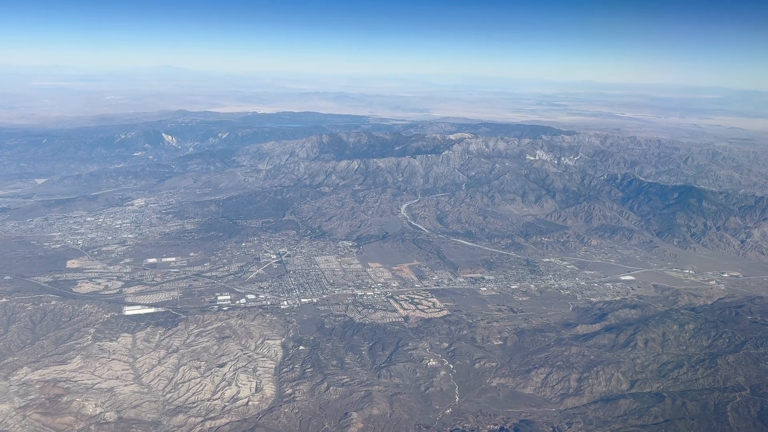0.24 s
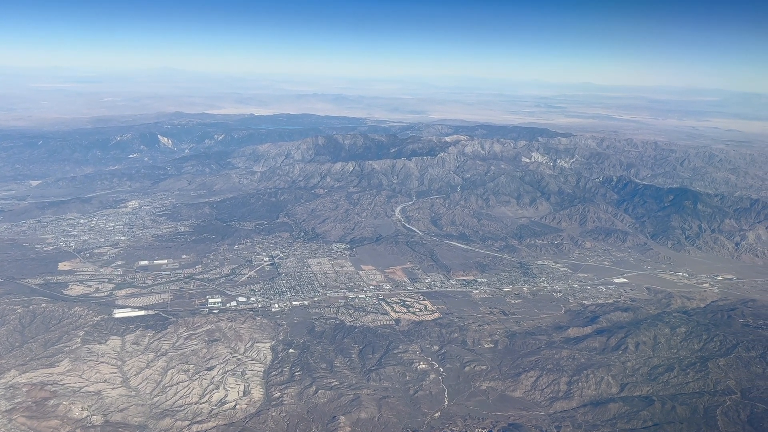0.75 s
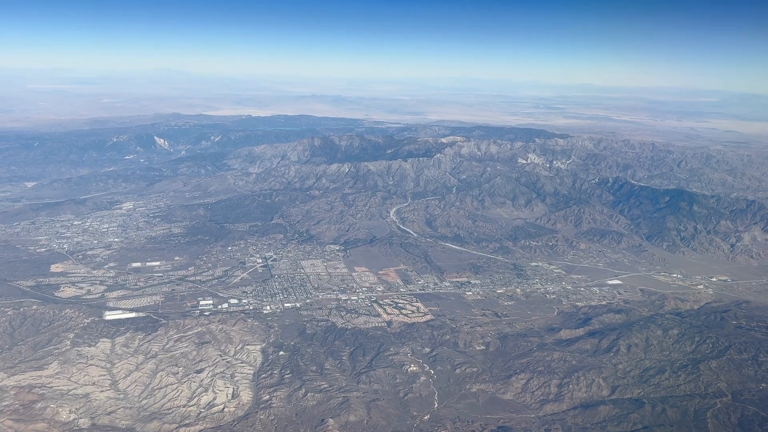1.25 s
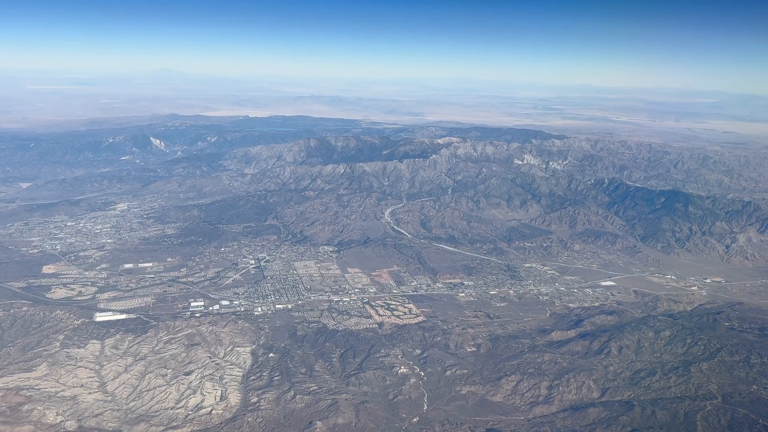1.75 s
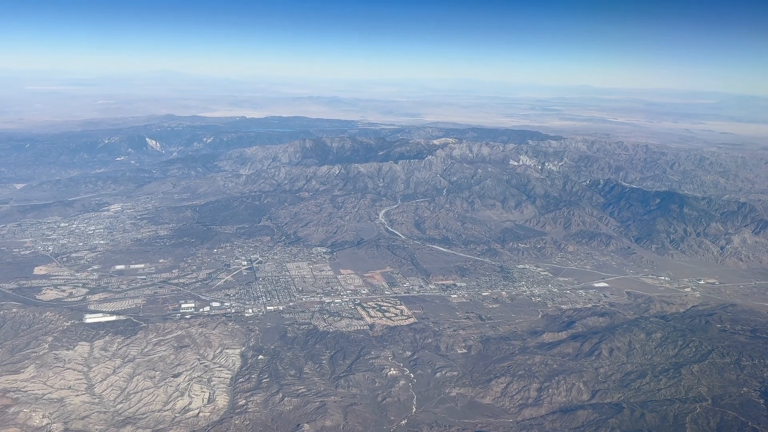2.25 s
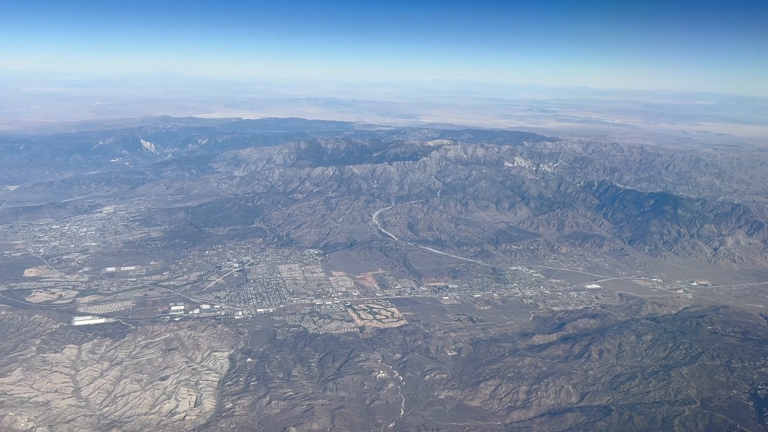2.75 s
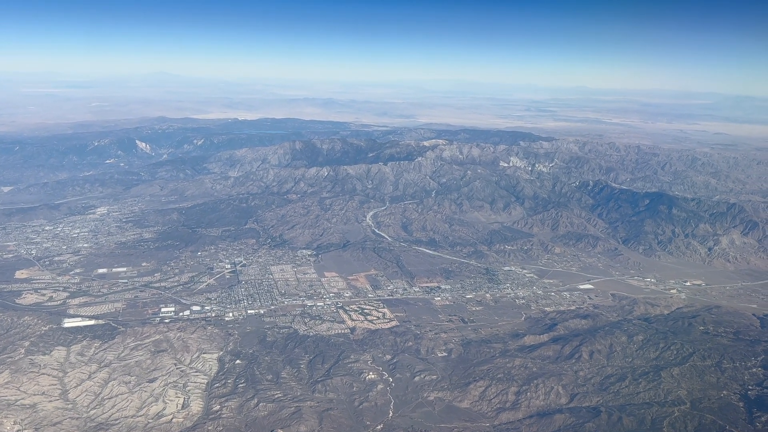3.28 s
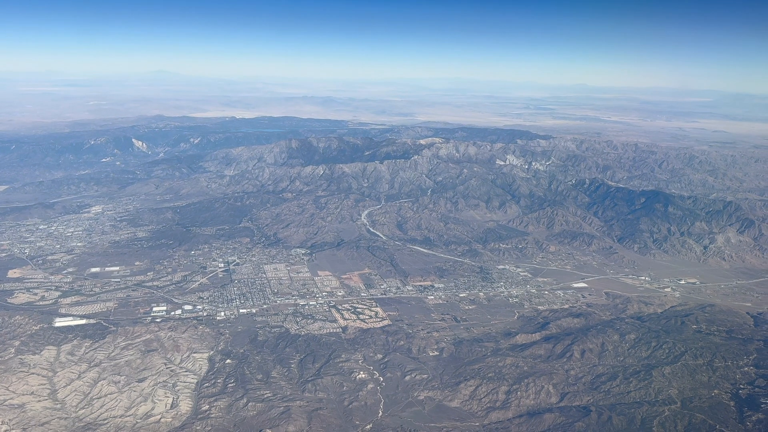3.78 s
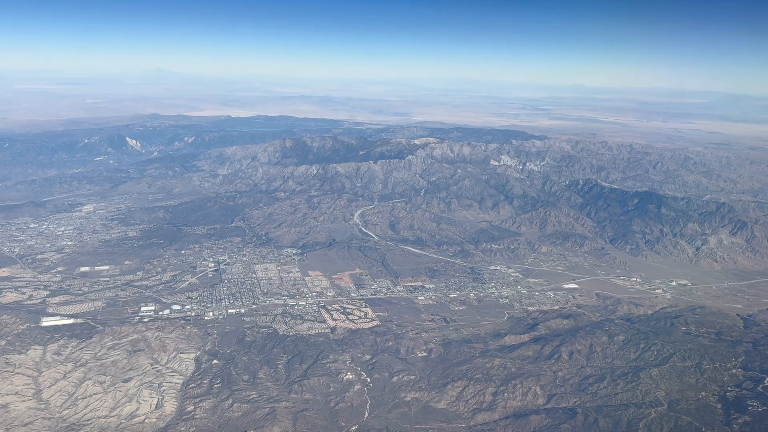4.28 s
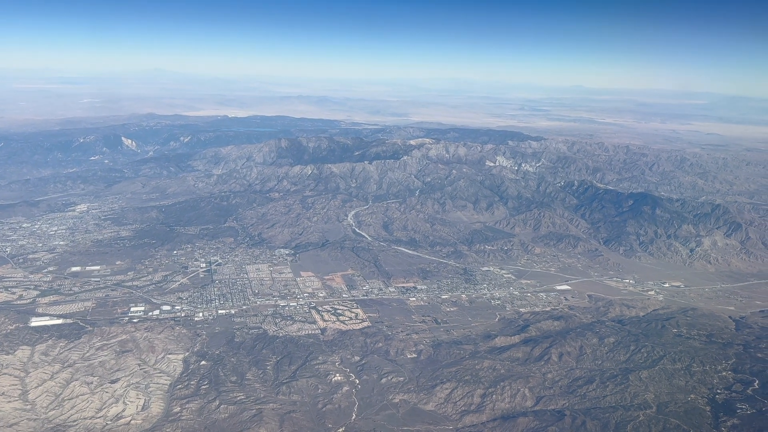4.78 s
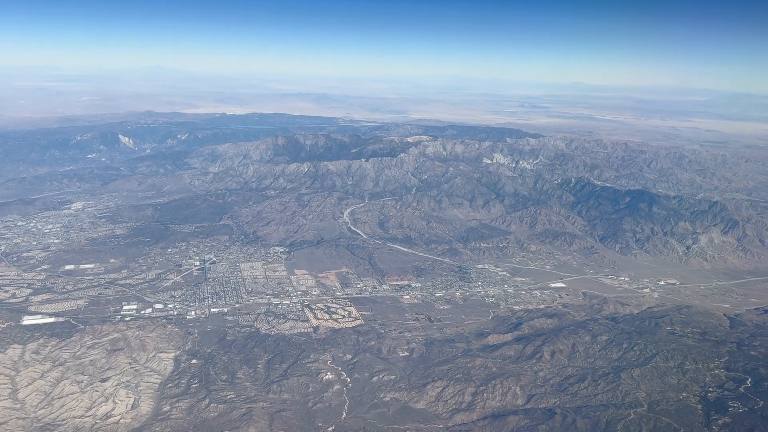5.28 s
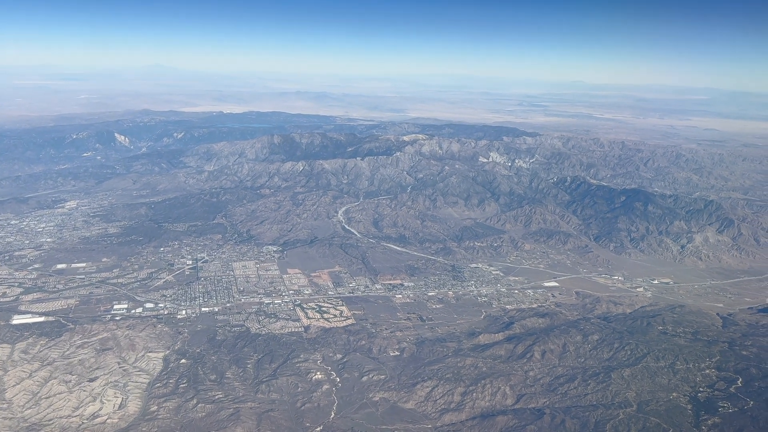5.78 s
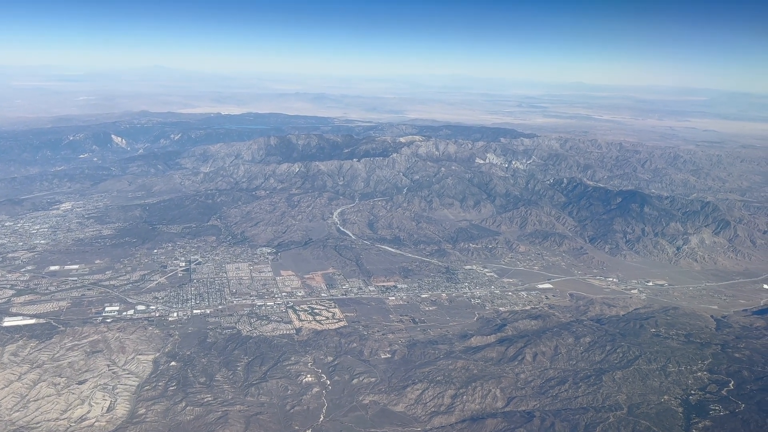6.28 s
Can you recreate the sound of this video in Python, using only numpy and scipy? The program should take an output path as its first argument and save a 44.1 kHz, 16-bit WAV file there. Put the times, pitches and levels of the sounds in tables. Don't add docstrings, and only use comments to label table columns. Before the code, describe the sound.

A broad, bass-heavy cabin roar fills both sides, gently gusting, with a hum around 800 hertz and faint higher machine tones inside it. Small close sounds sit on top: a crisp latch snap, light ticks, barely audible cloth rustles and seat squeaks. The sound sinks to complete silence, then fades up into a similar drone at another seat, ending with ticks.

```python
import sys
import numpy as np
from scipy import signal
from scipy.fft import rfft, irfft
from scipy.io import wavfile

SR = 44100
rng = np.random.default_rng(int(sys.argv[2]) if len(sys.argv) > 2 else 0)


def unload_wav(signal):
    wavfile.write(
        sys.argv[1],
        SR,
        np.round(np.clip(np.atleast_2d(signal).T, -1, 1) * 32767).astype(np.int16),
    )


def undo_db(level):
    steps = np.asarray(level, float) / 20
    return 10 ** steps


N = 287973
TIME = np.arange(N) / SR
CUT_S = 4.722

# freq_hz, density_db (per Hz)
RUMBLE_SPECTRUM = [(24, -39), (36, -34), (41, -25.5), (44, -12), (60, -8.5), (72, -5), (95, -2), (140, -1),
                   (200, -3.5), (230, -8), (300, -10.5), (400, -16), (500, -22), (570, -27.5)]
# freq_hz, density_db (per Hz)
HISS_SPECTRUM = [(750, -33), (1000, -38), (1400, -40), (2000, -45), (3000, -50), (4000, -53), (6000, -59),
                 (8000, -64), (11000, -66.5), (15700, -69.5)]
# freq_hz, change_db
SECOND_SEAT_COLOUR = [(30, -7), (45, -5.5), (62, 0.5), (100, -5), (150, -1.5), (300, -4), (500, 0),
                      (1200, 0.2), (4000, 1), (12000, 0.1)]
# freq_hz, likeness (0-1)
STEREO_LIKENESS = [(40, 0.87), (100, 0.93), (180, 0.98), (300, 0.55), (600, 0.42), (1400, 0.43),
                   (3100, 0.57), (6800, 0.36), (15000, 0.2)]
# freq_hz, left_over_right_db
STEREO_LEAN = [(60, -0.5), (110, 0.5), (200, -1.5), (380, 3), (700, -5), (1290, 4), (2380, -1.5),
               (4400, 1.0), (8120, 1), (15000, 2)]
# time_s, level_db
GUSTS = [(0, 1.5), (.6, -1), (1.4, 0.9), (1.85, -1.25), (2.6, -1), (3.3, 1), (3.7, -0.5), (4.5, .5),
         (5.5, -1.1), (6.1, 0.5), (6.35, -2.5), (6.53, 1.2)]
# centre_hz, width_hz, first_seat_db, second_seat_db, left_over_right_db
DUCT_RESONANCES = [(93.75, 10.7, -41.5, -40.5, 0.2), (171.7, 3, -54, -39, -0.5),
                   (200.7, 9.4, -39.5, -41.5, -0.8), (250.8, 5, -41.5, -42.5, 1.5),
                   (310.7, 8, -49.5, -48.5, 2.5), (372, 2.8, -52, -56.5, 1), (420.6, 5.3, -50, -57.5, -0.5),
                   (1488.3, 40, -60.5, -62.5, 3.5), (2986, 30, -75.5, -74, 7), (12200, 550, -90.5, -92, 2)]
# multiple (of the supply), first_seat_db, second_seat_db, left_over_right_db, left_lead_rad
WHINE_HARMONICS = [(2, -38.5, -38.5, 2.2, 0.29), (3, -63.5, -64, -2.5, 0), (4, -63, -64.5, -9.5, -.3),
                   (5, -65.5, -66, 1.5, -0.22), (6, -77, -73.5, -.6, 0), (7, -80.5, -78.5, 1, 0),
                   (8, -79, -83.5, -2.5, 0), (9, -83, -90, 3, 0), (10, -71.5, -77, 2, 0.095),
                   (11, -81.5, -79.5, -3, 0.038), (13, -82, -81.5, -1.5, 0), (14, -80.5, -83.5, 6, .2),
                   (15, -82, -90, -3.5, -0.038), (16, -93, -91, 3.5, 0), (17, -94.5, -87, -5.5, 0),
                   (18, -96.5, -97, 3.5, 0), (19, -90.5, -97, 3, 0)]
PUMPS_IN_STEP_S = [.05, .53, 1.54, 4.45, 5.1, 6.25]
# first_seat_hz, second_seat_hz, level_db, wander_hz, waver_db
SHAFT_TONES = [(1481, 1489, -59, 3.986, 2), (2593, 2600, -76, 1.5, 3.5), (3709, 4000, -88.5, 0.99, 1.5),
               (3950, 6600, -83, 1.9, 0), (5930, 4600, -87, 1.5, 0.5)]
# mode_hz, width_hz, level_db
LATCH_RINGING = [(1760, 380, 2.5), (2260, 400, -3.5), (3470, 730, 3.5), (4400, 1200, -9.5), (5460, 940, -8),
                 (6350, 630, -3.5), (8750, 1300, -8), (10500, 1500, -7), (12100, 1100, -6.5),
                 (14600, 1000, -10.5)]
# start_s, peak_db, centre_hz,
# t60_s
TICKS = [(.044, -50, 4800, .03), (6.517, -43, 4300, .03), (1.831, -44, 4700, .025),
         (1.8395, -37, 2100, .05), (6.073, -43, 3800, .08), (6.08, -42, 2300, .08),
         (6.21, -44, 2500, .05), (2.086, -56, 6000, .03), (2.655, -58, 8000, .04),
         (3.61, -53, 3000, .04), (4.912, -50, 8000, .03), (5.125, -57, 7000, .03),
         (5.742, -58, 8000, .04)]
# start_s, length_s, level_db, centre_hz, width_hz
CLOTH_RUSTLES = [
    (.085, .055, -67, 5000, 2000),
    (4.87, .17, -65, 4800, 700),
    (5.34, .12, -70, 7000, 2500),
    (2.42, .16, -76, 9000, 5000),
    (4.88, .12, -71, 6300, 2500),
    (5.12, .1, -74, 7500, 6000),
    (5.335, .1, -70, 9500, 6000),
    (6.068, .038, -65, 4800, 4500),
]
# start_s, length_s, level_db, start_hz, end_hz
SEAT_SQUEAKS = [
    (2.58, .34, -75, 3280, 3420),
    (2.98, .2, -69, 3390, 3420),
    (4.76, .3, -67, 1620, 1920),
    (5.46, .14, -71, 2540, 2660),
    (6.37, .17, -69, 3790, 4010),
    (.03, .04, -57, 1300, 1300),
    (1.17, .07, -52, 680, 680),
]


def rms_one(x):
    return x / np.sqrt(np.mean(x ** 2) + 1e-20)


def by_seat(first, second):
    return np.where(TIME < CUT_S, first, second)


def at_hz(points, hz):
    points_hz, values = np.transpose(points)
    return np.interp(np.log(hz), np.log(points_hz), values)


def pan(x, lean_db):
    return x * undo_db(lean_db * np.array([[.5], [-.5]]))


def stereo(mid, side):
    return mid + side * [[1], [-1]]


def resonate(x, hz, width_hz):
    r = np.exp(-np.pi * width_hz / SR)
    poles = [1, -2 * r * np.cos(2 * np.pi * hz / SR), r * r]
    return signal.lfilter([(1 - r * r) / 2, 0, (r * r - 1) / 2], poles, x)


def resonate_twice(x, hz, width_hz):
    return resonate(resonate(x, hz, width_hz), hz, width_hz)


def drift(rate_hz):
    r = np.exp(-2 * np.pi * rate_hz / SR)
    slow = signal.lfilter([1], [1, -2 * r, r * r], rng.standard_normal(N + SR))
    return rms_one(slow[SR:])


def tone(hz, lead_rad=0, turn=0):
    turns = np.cumsum(hz) / SR + turn
    return np.sqrt(2) * np.sin(2 * np.pi * turns + np.array([[lead_rad], [0]]))


def window(start_s, length_s):
    return np.sin(np.pi * np.clip((TIME - start_s) / length_s, 0, 1)) ** .5


def fan():
    level_db = by_seat(-48.5, -60.5) + 1.5 * drift(3.5)
    return undo_db(level_db) * tone(47 + .4 * drift(3))


def shafts():
    out = 0
    for first_hz, second_hz, level_db, wander_hz, waver_db in SHAFT_TONES:
        hz = by_seat(first_hz, second_hz) + wander_hz * drift(5.93)
        out = out + undo_db(level_db + waver_db * drift(8.3)) * tone(hz)
    return out


def spool():
    creep_hz_per_s, climb_start_s, climb_hz_per_s = 2.2, 2.0, 10.2
    hz = 457.7 + creep_hz_per_s * TIME + climb_hz_per_s * np.maximum(TIME - climb_start_s, 0)
    level_db = -52.5 + 2.9 * drift(6.2)
    return (TIME < CUT_S) * undo_db(level_db) * tone(hz + 1.5 * drift(5.5), lead_rad=.2)


def squeaks():
    out = 0
    for start_s, length_s, level_db, start_hz, end_hz in SEAT_SQUEAKS:
        glide_hz = np.interp(TIME, [start_s, start_s + length_s], [start_hz, end_hz])
        hz = glide_hz + 20 * drift(30)
        out = out + undo_db(level_db + 2.4 * drift(30)) * window(start_s, length_s) * tone(hz)
    return out


def rustles():
    out = 0
    for start_s, length_s, level_db, hz, width_hz in CLOTH_RUSTLES:
        mid, side = resonate_twice(rng.standard_normal((2, N)), hz, width_hz)
        rub = rms_one(stereo(mid, 0.24 * side))
        out = out + undo_db(level_db + 2.0 * drift(120)) * window(start_s, length_s) * rub
    return out


def ticks():
    out = np.zeros((2, N))
    after_s = np.arange(SR // 8) / SR
    for start_s, peak_db, hz, t60_s in TICKS:
        mid, side = rng.standard_normal((2, len(after_s)))
        crack = undo_db(-60 * after_s / t60_s) * np.minimum(after_s / .0008, 1)
        tail = undo_db(-17 - 60 * after_s / .12)
        burst = resonate_twice(stereo(mid, .4 * side) * (crack + tail), hz, .75 * hz)
        at = round(start_s * SR)
        out[:, at:at + len(after_s)] += undo_db(peak_db) * burst[:, :N - at]
    return out


def latch():
    release_s, scrape_lead_s = 1.839, .0025
    mid, side = rng.standard_normal((2, N))
    away_ms = 1000 * np.abs(TIME - release_s)
    snap = undo_db(-40 - 11 * away_ms)
    scrape = (TIME > release_s - scrape_lead_s) * undo_db(-50 - .9 * away_ms)
    force = (snap + scrape) * stereo(mid, .5 * side)
    out = 0
    for hz, width_hz, level_db in LATCH_RINGING:
        out = out + undo_db(level_db) * np.sqrt(2500 / width_hz) * resonate(force, hz, width_hz)
    return out


def load():
    start_s, rise_s, hold_s, release_s = .66, .14, .36, .09
    return np.interp(TIME, np.cumsum([start_s, rise_s, hold_s, release_s]), [0, 1, 1, 0])


def pumps():
    sag_hz = 16.8
    hz_a = by_seat(899.05, 899.65) - sag_hz * load()
    hz_b = by_seat(896.95, 897.95)
    apart = np.interp(PUMPS_IN_STEP_S, TIME, np.cumsum(hz_a - hz_b) / SR)
    slip = np.interp(TIME, PUMPS_IN_STEP_S, apart - np.round(apart))
    pump_a = undo_db(-46.5 - 2.0 * load()) * tone(hz_a, lead_rad=0.62)
    pump_b = undo_db(-58) * tone(hz_b, lead_rad=0.6, turn=slip)
    return pan(pump_a + pump_b, lean_db=-3.5)


def whine():
    supply_hz = by_seat(402.75, 403.45)
    swell_db = 1.5 * load()
    out = 0
    for multiple, first_db, second_db, lean_db, lead_rad in WHINE_HARMONICS:
        if multiple < 2.5:
            waver_db = swell_db + .5 * drift(4.5)
        else:
            waver_db = 0.87 * drift(4.3)
        harmonic = tone(np.round(multiple) * supply_hz, lead_rad, rng.random())
        out = out + undo_db(by_seat(first_db, second_db) + waver_db) * pan(harmonic, lean_db)
    return out


def ducts():
    out = 0
    for hz, width_hz, first_db, second_db, lean_db in DUCT_RESONANCES:
        mid, side = resonate_twice(rng.standard_normal((2, N)), hz, width_hz)
        singing = rms_one(stereo(mid, 0.27 * side))
        out = out + undo_db(by_seat(first_db, second_db)) * pan(singing, lean_db)
    return out


def at_both_seats(spectrum, hz):
    second = spectrum * undo_db(at_hz(SECOND_SEAT_COLOUR, hz))
    return by_seat(irfft(spectrum, N), irfft(second, N))


def airflow():
    hz = np.maximum(np.fft.rfftfreq(N, 1 / SR), 1)
    mid, side = rfft(rng.standard_normal((2, N)))
    alike = np.clip(at_hz(STEREO_LIKENESS, hz), 0, 1)
    pair = stereo(np.sqrt(1 + alike) * mid, np.sqrt(1 - alike) * side)
    pair = pan(pair * undo_db(at_hz(RUMBLE_SPECTRUM + HISS_SPECTRUM, hz)), at_hz(STEREO_LEAN, hz))
    pair = pair / np.std(irfft(pair, N))
    low_share = 1 / (1 + (hz / 600) ** 2)
    gust_s, gust_points_db = np.transpose(GUSTS)
    gust_db = np.interp(TIME, gust_s, gust_points_db)
    rumble = undo_db(gust_db) * at_both_seats(pair * low_share, hz)
    hiss_db = .6 + 0.16 * gust_db + .3 * drift(25)
    hiss = undo_db(hiss_db) * at_both_seats(pair * (1 - low_share), hz)
    return undo_db(-26.5) * (rumble + hiss)


def scene():
    machinery = fan() + shafts() + spool() + pumps() + whine()
    close_by = squeaks() + rustles() + ticks() + latch()
    return machinery + close_by + ducts() + airflow()


def fader():
    silence_s, fade_out_s, fade_in_s = .003, 1.935, 1.216
    away_s = np.abs(TIME - CUT_S) - silence_s
    fade_out = np.clip(away_s / fade_out_s, 0, 1) ** 0.95
    fade_in = np.clip(away_s / fade_in_s, 0, 1)
    return by_seat(fade_out, fade_in)


def band_limit(x):
    return signal.sosfilt(signal.butter(12, 15710, fs=SR, output="sos"), x)


def record(dry):
    floor = undo_db(-92) * rng.standard_normal((2, N))
    word_steps = 2 ** 15
    faded = np.round((dry + floor) * fader() * word_steps) / word_steps
    top_cut = signal.cheby2(10, 50, 16800, fs=SR, output="sos")
    return band_limit(signal.sosfilt(top_cut, faded))


dry = scene()
out = record(dry)
unload_wav(out)
```